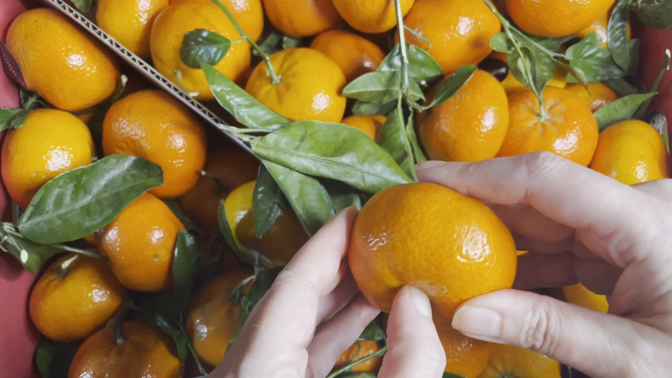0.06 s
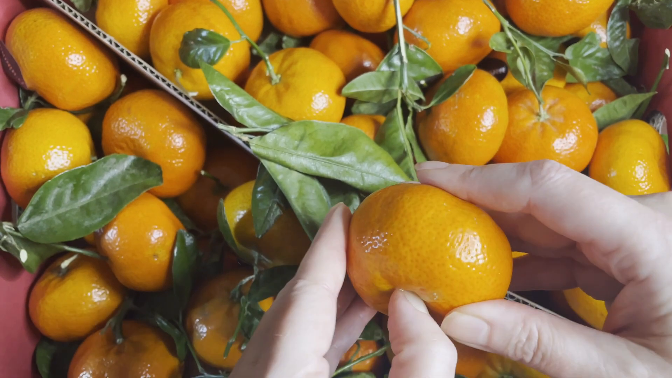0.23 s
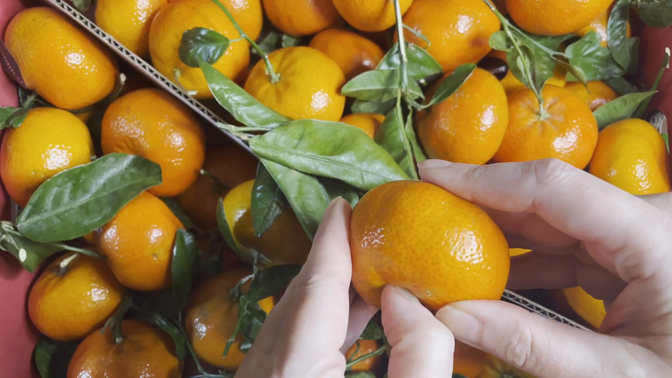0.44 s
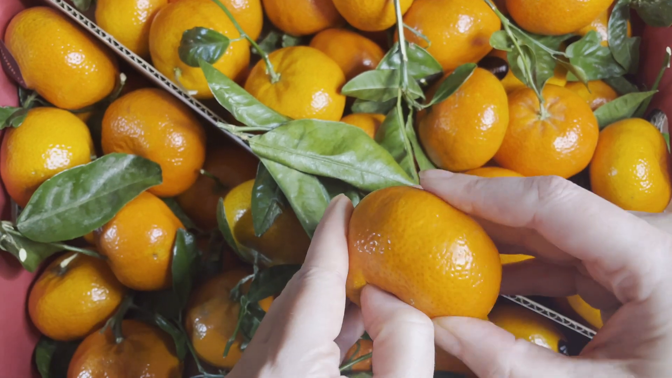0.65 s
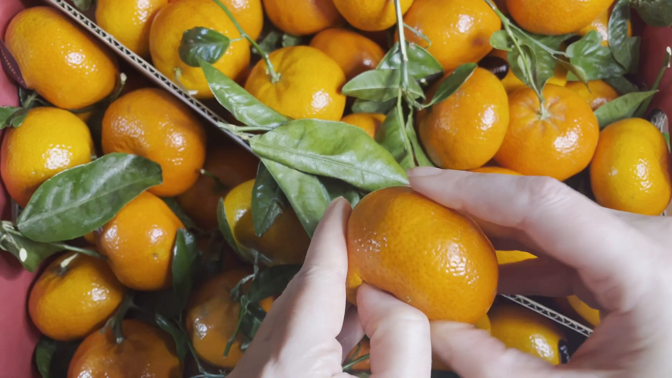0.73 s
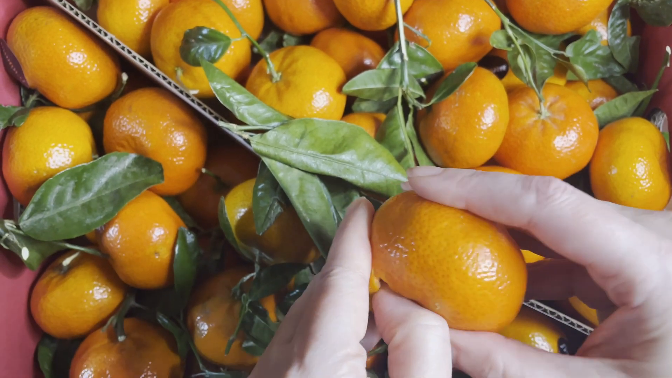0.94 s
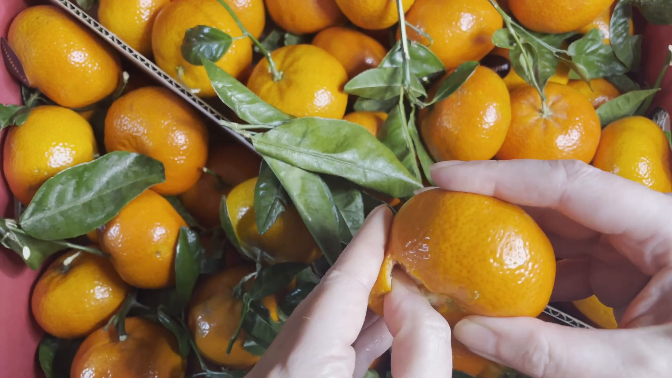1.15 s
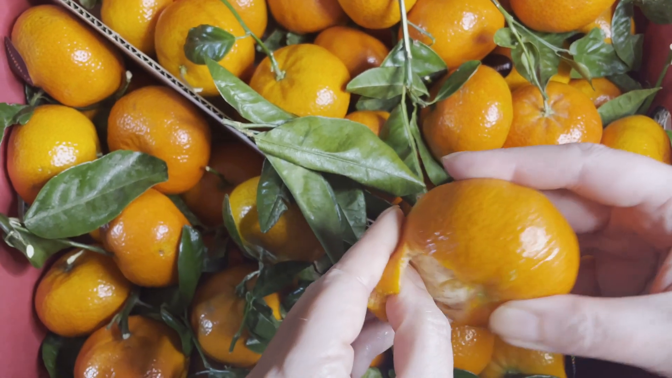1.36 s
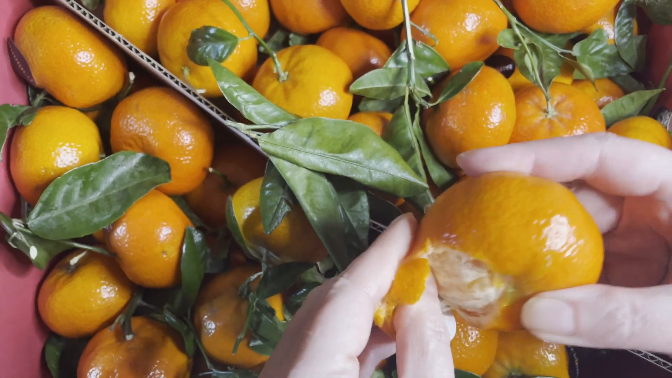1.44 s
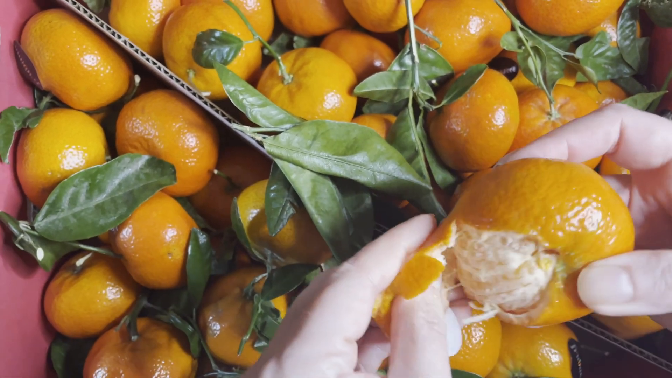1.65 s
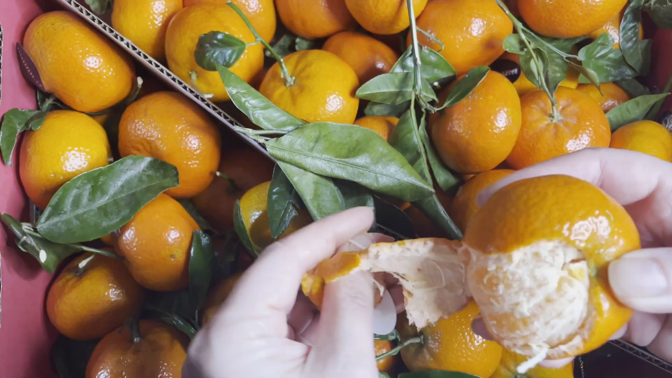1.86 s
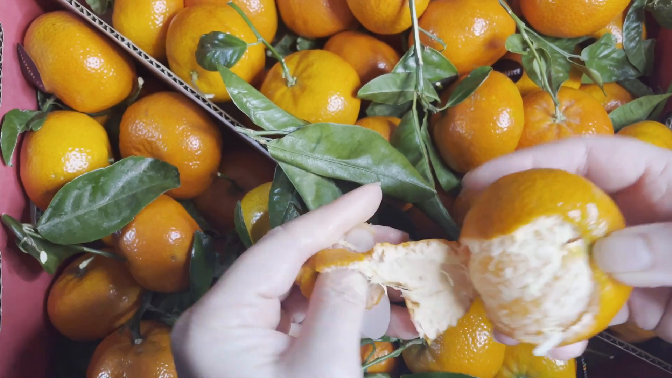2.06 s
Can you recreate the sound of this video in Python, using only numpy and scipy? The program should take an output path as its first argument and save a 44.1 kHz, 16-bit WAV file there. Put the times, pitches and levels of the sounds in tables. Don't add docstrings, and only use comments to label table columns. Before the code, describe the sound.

Mandarin peel being torn off by hand, crisp close snaps and wet crackles over faint hum

```python
import sys
import numpy as np
from scipy import signal
from scipy.fft import rfft, irfft, next_fast_len
from scipy.io import wavfile
from scipy.ndimage import uniform_filter1d

SR = 44100
rng = np.random.default_rng(int(sys.argv[2]) if len(sys.argv) > 2 else 0)


def volts_from_decibels(level):
    exponent = np.asarray(level, float) / 20
    return 10 ** exponent


def generate_wav(signal):
    frames = np.transpose(np.atleast_2d(signal))
    scaled = np.clip(frames, -1, 1) * 32767
    pcm = np.round(scaled).astype(np.int16)
    wavfile.write(sys.argv[1], SR, pcm)


N = 92610

# pitch_hz, level_db (per Hz)
AIR_SPECTRUM = [(250, -31), (330, 4), (700, -9.5), (1600, -18.5), (4500, -19.5), (11000, -19), (13600, -25),
                (14800, -63.5)]
# pitch_hz, level_db (per Hz)
RUMBLE_SPECTRUM = [(20, -46), (45, -11.5), (60, -7.5), (100, -11), (200, -13.5), (270, -15), (310, -24.5),
                   (420, -48)]
# pitch_hz, level_db, width_hz, steady_share (0 to 1)
HUM_TONES = [
    (59.3, -59.5, 7.6, 0.45),
    (119.1, -65.5, 7.4, 0.88),
    (173.2, -64, 4.1, 0),
    (195.1, -70, 11, 0.06),
    (251, -52.5, 2.43, 0.62),
]
# pitch_hz, phase_rad
LEFT_LEAD = [(0, 0), (1200, -.1), (4900, 1), (6200, -1.7), (7300, -3.14), (10500, -6.2), (14200, -9.4),
             (16600, -11.6)]
# pitch_hz, left_minus_right_db
LEFT_LEAN = [(40, 1.8), (100, 1.6), (250, 3.3), (700, 4), (1400, 1), (2800, 2), (6000, 0)]
# pitch_hz, likeness (0 to 1)
PORT_LIKENESS = [(40, .97), (130, .8), (290, .94), (600, .1), (1500, .7), (4000, .85), (7300, .98)]
# time_s, pitch_hz, level_db
SQUEAK_PATH = [
    (0.09, 10200, -46.5),
    (0.103, 8950, -48),
    (0.116, 8800, -49.5),
    (.136, 7500, -48.5),
    (.15, 8800, -54.5),
    (0.161, 9240, -42.5),
    (0.173, 10300, -53),
    (0.186, 10920, -51),
]
# start_s, level_db, pitch_hz
FINE_THREADS = [(.2128, -38, 6060), (.628, -53, 5450), (1.2408, -53.5, 2150), (1.3235, -41, 2400),
                (1.332, -39, 4400), (1.335, -47, 1500), (1.342, -39, 4400), (1.537, -52.5, 1380),
                (1.5778, -37.5, 4860), (1.6605, -55, 2500), (1.669, -45, 2300), (1.6965, -36, 1590),
                (1.7005, -46.5, 2400), (1.7035, -31, 3020), (1.707, -42, 1797), (1.7197, -32, 3440),
                (1.731, -44, 1990), (1.7362, -41, 3500), (1.7383, -41, 2300), (1.7848, -41, 3500),
                (1.794, -40, 2500), (1.826, -55, 1390), (1.9365, -57, 2500), (1.993, -57.5, 2330),
                (1.297, -46, 1500), (1.6467, -48, 2000), (.478, -62.5, 9000), (.5465, -53.5, 5000)]
# start_s, level_db, rise_s, left_minus_right_db
THICK_STRANDS = [
    (0.2514, -17.5, 0.0013, 0.5),
    (0.6522, -22.5, 0.00034, 4),
    (1.3156, -25, 0.00098, 5),
    (1.3546, -17.5, 0.0012, 7.5),
]
# pitch_hz, width_hz, level_db
STRAND_1_RINGS = [(638, 110, -23), (1260, 290, -13.5), (4404, 210, -16), (6040, 390, -1), (7570, 300, 4),
                  (9610, 500, -0.5), (10660, 390, 7), (12720, 230, -9.5)]
STRAND_2_RINGS = [(1500, 166, -6.5), (2360, 140, -13.5), (4500, 120, -10), (5800, 300, -2),
                  (6450, 220, 4.5), (10200, 400, -4.5), (11700, 420, -1), (13100, 310, -2)]
STRAND_3_RINGS = [(1500, 180, -15), (2420, 150, -10), (4350, 220, 1.5), (6130, 260, 0.5), (7480, 150, 6),
                  (9600, 300, -5), (11000, 220, -13), (11500, 300, -6.5)]
STRAND_4_RINGS = [(1260, 260, -14), (2310, 255, -3), (3290, 400, -1), (4020, 260, 1.5), (5020, 160, -7.5),
                  (6390, 200, -6), (10200, 600, -1.5), (12000, 500, -1.5)]
# start_s, edge_db, pulp_db, rind_db, spray_db
EARLY_FIBRES = [(0.0004, -55.5, -35.5, -55.5, -57), (0.0097, -75, -46.5, -60, -56),
                (0.0754, -77, -42.5, -60, -48.5), (0.2015, -25.5, -65, -77, -22.5),
                (0.2156, -32, -56, -71.5, -28.5), (0.2538, -24.5, -53, -39, -27.5),
                (0.5464, -56, -47.5, -69, -65), (0.5989, -54.5, -51.5, -66, -65),
                (0.6522, -25.5, -34, -41, -22.5), (0.685, -47, -49, -63, -50.5),
                (0.7863, -43.5, -42.5, -46, -68), (0.817, -55, -66, -83, -47.5),
                (0.8982, -44.5, -46.5, -47, -58.5), (0.9358, -64, -43.5, -59, -56),
                (0.9734, -44.5, -54.5, -53.5, -47.5), (1.042, -50.5, -49, -46, -43.5),
                (1.0493, -48, -48, -47.5, -51), (1.061, -43, -32, -46.5, -42.5),
                (1.0645, -57, -43, -43, -51), (1.0846, -59, -63, -71, -40), (1.1041, -39, -33, -48, -42),
                (1.1342, -39, -46, -45.5, -49), (1.1544, -41, -48, -43.5, -51.5)]
LATE_FIBRES = [(1.2612, -57, -67, -55, -60), (1.271, -49, -49, -50, -68), (1.2936, -56, -51, -48, -37.5),
               (1.2987, -39.5, -60, -48.5, -40), (1.3185, -29, -43, -36.5, -27),
               (1.355, -27, -37, -27, -23), (1.365, -34.5, -41, -37.5, -50),
               (1.4015, -54, -67, -47.5, -42.5), (1.449, -58, -44.5, -49, -55),
               (1.468, -47.5, -70, -34, -49), (1.4789, -52, -34.5, -46, -73.5),
               (1.5739, -44.5, -39, -49.5, -46.5), (1.5913, -44, -47, -57, -37.5),
               (1.612, -59, -38.5, -48, -41), (1.6229, -43, -64, -43, -43),
               (1.6355, -34.5, -64, -37.5, -60), (1.6793, -60, -55, -39.5, -49.5),
               (1.6916, -56, -37, -44.5, -52), (1.7108, -57, -46, -41, -51), (1.7412, -50, -40, -54, -46.5),
               (1.7642, -39, -35.5, -37, -48), (1.7921, -49, -74, -48, -48.5),
               (1.8097, -61, -45.5, -51.5, -56.5)]
# start_s, length_s, effort_db, wetness_db
PULLS = [(-.03, 0.18, -75, -13), (0.063, 0.11, -68.5, 4.5), (0.165, 0.11, -60, 3.5), (0.5, 0.15, -66, -9),
         (0.643, 0.25, -64.5, -6.5), (0.882, 0.34, -65.5, -6.5), (1.047, 0.18, -53.5, -5),
         (1.202, 0.49, -61, -3.5), (1.315, 0.11, -51, -2.5), (1.431, 0.077, -58, -6.5),
         (1.496, 0.097, -74, -4), (1.57, 0.16, -54.5, -5.5), (1.659, 0.1, -52, -6),
         (1.694, 0.16, -52, -8.5), (1.818, 0.73, -73, -5.5)]
# pitch_hz, t60_s (time to fall 60 dB), level_db
EDGE_RINGS = [(4760, 0.001, -8), (6445, 0.0035, -3), (7160, 0.0061, -4)]
PULP_RINGS = [(510, 0.01, -6.5), (810, 0.0076, -5.5), (1250, 0.0077, -12.5), (1467, 0.007, 9)]
RIND_RINGS = [(2440, 0.0097, -4.5), (3030, 0.003, 2.7), (3970, 0.0054, 0.7), (4610, 0.007, -0.5)]
SPRAY_RINGS = [(8800, 0.0019, -9.5), (10200, 0.00087, 19), (11370, 0.0025, 3.5), (12740, 0.0046, 1.5),
               (15900, 0.0045, -28)]
SNAP_LEVELS = [4, -5, 4, 3]
CRACKLE_LEVELS = [-2.5, -27, -8.5, -2]
# low_hz, high_hz
RING_BANDS = [(5030, 8000), (798, 1810), (1930, 8700), (8400, 20000)]

RING_GROUPS = [EDGE_RINGS, PULP_RINGS, RIND_RINGS, SPRAY_RINGS]
STRAND_RINGS = [STRAND_1_RINGS, STRAND_2_RINGS, STRAND_3_RINGS, STRAND_4_RINGS]

AIR_DB, RUMBLE_DB = -74, -60.5
LULL_S, LULL_WIDTH_S, LULL_DB, LULL_HZ = .43, .09, -6, 1200
ROOM_DB, ROOM_T60_S, GAP_S = -18.5, 0.24, .004
SLIPS_PER_S, SQUEAK_WIDTH_HZ, SQUEAK_AIR = 108, 600, .06
THREAD_S, THREAD_SHARP = .0012, 2.5
BREAK_S, BREAK_RISE_S, FIRST_CRACK = .001, .00015, 1.05
DETUNE = .025
CRACKS_PER_S, SPREAD_DB, RUSTLE_DB = 700, 3.6, -7
PULL_RISE = 0.53
TOP_HZ = 15800


def read(points, hz):
    f, value = np.transpose(points)
    return np.interp(np.log(hz + 1), np.log(f + 1), value)


def evened(x):
    return x / np.sqrt(np.mean(x ** 2) + 1e-30)


def filtered(x, order, hz, kind="low"):
    return signal.sosfilt(signal.butter(order, hz, kind, fs=SR, output="sos"), x)


def coloured(points):
    spectrum = rfft(rng.standard_normal((2, N)))
    return evened(irfft(spectrum * volts_from_decibels(read(points, np.fft.rfftfreq(N, 1 / SR))), N))


def resonate(x, hz, width_hz):
    turn = np.exp(2j * np.pi * np.cumsum(hz * np.ones(N)) / SR)
    r = np.exp(-np.pi * width_hz / SR)
    return 2 * (turn * signal.lfilter([1 - r], [1, -r], x / turn)).real


def ring(modes, band_hz, tune=1):
    t = np.arange(600) / SR
    h = np.zeros(600)
    for (hz, t60, db), detune in zip(modes, tune * np.ones(5)):
        h += volts_from_decibels(db - 60 * t / t60) * np.sin(2 * np.pi * hz * detune * t)
    h = filtered(h, 3, band_hz, "band")
    return h / np.linalg.norm(h)


def add(mix, s, sound):
    mix[:, round(s * SR):][:, :sound.shape[1]] += sound


def ports(pair, same):
    size = next_fast_len(N + 4096)
    hz = np.fft.rfftfreq(size, 1 / SR)
    a, b = rfft(np.pad(pair, ((0, 0), (2048, 2048)), "reflect"), size)
    same = read(PORT_LIKENESS, hz) ** same
    half = volts_from_decibels(read(LEFT_LEAN, hz) / 2) * np.exp(.5j * read(LEFT_LEAD, hz))
    left, right = a * half, (same * a + np.sqrt(1 - same ** 2) * b) / half
    return irfft(np.array([left, right]), size)[:, 2048:2048 + N]


def air():
    t = np.arange(N) / SR
    hiss = filtered(volts_from_decibels(AIR_DB) * coloured(AIR_SPECTRUM), 8, 14000)
    upper = signal.sosfiltfilt(signal.butter(2, LULL_HZ, "high", fs=SR, output="sos"), hiss)
    lull = volts_from_decibels(LULL_DB * np.exp(-((t - LULL_S) / LULL_WIDTH_S) ** 2))
    return hiss + (lull - 1) * upper


def hum():
    t = np.arange(N) / SR
    out = volts_from_decibels(RUMBLE_DB) * coloured(RUMBLE_SPECTRUM)
    for hz, db, width_hz, steady in HUM_TONES:
        noise = rng.standard_normal((2, N))
        waver = evened(resonate(resonate(noise, hz, width_hz), hz, width_hz))
        tone = np.sqrt(2) * np.sin(2 * np.pi * hz * t + [[0], [1.5]])
        out += volts_from_decibels(db) * evened(steady * tone + (1 - steady) * waver)
    return out


def room(x):
    taps = np.zeros((2, 16000))
    at = np.arange(0, 15980, 20) + rng.integers(0, 20, (2, 799))
    np.put_along_axis(taps, at, rng.choice([-1., 1.], at.shape), 1)
    t = np.arange(16000) / SR
    taps *= volts_from_decibels(-60 * t / ROOM_T60_S) * (t > GAP_S)
    taps = filtered(taps, 8, 14300)
    return volts_from_decibels(ROOM_DB) * signal.fftconvolve(x[None], taps / np.linalg.norm(taps[0]), axes=1)[:, :N]


def squeak():
    s, hz, db = np.transpose(SQUEAK_PATH)
    t = np.arange(N) / SR
    unevenness = evened(uniform_filter1d(rng.standard_normal(N), 500))
    turns = np.cumsum(SLIPS_PER_S * (1 + 0.292 * unevenness)) / SR
    puffs = (SQUEAK_AIR + np.exp(-(turns % 1) / .25)) * rng.standard_normal((2, N))
    hz = np.interp(t, s, hz)
    sound = resonate(resonate(puffs, hz, SQUEAK_WIDTH_HZ), hz, 3 * SQUEAK_WIDTH_HZ)
    return evened(sound) * volts_from_decibels(np.interp(t, s, db, -200, -200))


def threads():
    t, out = np.arange(400) / SR, np.zeros((3, N))
    for s, db, hz in FINE_THREADS:
        puff = rng.standard_normal((3, 400)) * np.exp(-t / THREAD_S) + 2 * (t == 0)
        sound = signal.lfilter(*signal.iirpeak(hz, THREAD_SHARP, SR), puff)
        add(out, s, 4 * volts_from_decibels(db) * sound / np.linalg.norm(sound[0]))
    return out


def strands():
    t, out = np.arange(900) / SR, np.zeros((3, N))
    for (s, db, rise_s, lean_db), modes in zip(THICK_STRANDS, STRAND_RINGS):
        sound = np.zeros((3, 900))
        for hz, width_hz, mode_db in modes:
            fade = np.exp(-np.pi * width_hz * (t - rise_s))
            sound += volts_from_decibels(mode_db) * fade * np.sin(2 * np.pi * (hz * t + rng.random((3, 1))))
        sound[2] *= volts_from_decibels(-3) * evened(uniform_filter1d(rng.standard_normal(900), size=10))
        level = volts_from_decibels(db + lean_db * np.array([[0], [-1], [0]]))
        add(out, s, level * (1 - np.exp(-(t / rise_s) ** 3)) * sound)
    return out


def break_shape():
    u = np.arange(200) / SR
    return (1 - np.exp(-(u / BREAK_RISE_S) ** 2)) * np.exp(-u / BREAK_S)


def crackle():
    t, out = np.arange(N) / SR, np.zeros((3, N))
    swell = np.array([np.sin(np.pi * np.clip((t - s) / length, 0, 1) ** PULL_RISE)
                      for s, length, _, _ in PULLS])
    effort_db, wet_db = np.transpose(PULLS)[2:]
    at = rng.random(N) < CRACKS_PER_S / SR
    size = at * volts_from_decibels(SPREAD_DB * np.minimum(rng.exponential(1, N), 4))
    wet_effect = [0.43, -2.5, -0.53, 1]
    for k, modes in enumerate(RING_GROUPS):
        hits = size * volts_from_decibels(4 * rng.standard_normal(N))
        clicks = evened(signal.oaconvolve(hits, break_shape()[::2])[:N])
        grain = (clicks + volts_from_decibels(RUSTLE_DB)) * rng.standard_normal((3, N))
        pull = volts_from_decibels(effort_db + CRACKLE_LEVELS[k] + wet_db * wet_effect[k]) @ swell
        band_hz = np.minimum(np.multiply(RING_BANDS[k], [.45, 1]), 14500)
        out += signal.oaconvolve(grain * pull, ring(modes[:4], band_hz)[None], axes=1)[:, :N]
    return out


def snaps():
    out = np.zeros((3, N))
    for row in np.concatenate([EARLY_FIBRES, LATE_FIBRES]):
        crack = rng.standard_normal((2, 200)) ** 3 * break_shape()
        crack /= np.linalg.norm(crack, axis=1, keepdims=True)
        crack[:, 6] += FIRST_CRACK
        crack = np.vstack([crack, np.arange(200) == 6])
        tunes = 1 + DETUNE * rng.standard_normal((4, 5))
        for k, modes in enumerate(RING_GROUPS):
            sound = signal.fftconvolve(crack, ring(modes, RING_BANDS[k], tunes[k])[None], axes=1)
            add(out, row[0], 4 * volts_from_decibels(row[1 + k] + SNAP_LEVELS[k]) * sound)
    return out


def scene():
    near = snaps() + crackle() + strands() + threads()
    wet = squeak()
    tail = ports(room(near[2] + wet[0]), .5)
    background = ports(air() + hum(), .8)
    return ports(near[:2] + wet, .45) + tail + background


def roll_off(x):
    return signal.sosfilt(signal.butter(12, 17030, fs=SR, output="sos"), x)


def record(dry):
    return roll_off(filtered(dry, 10, TOP_HZ))


dry = scene()
out = record(dry)
generate_wav(out)
```